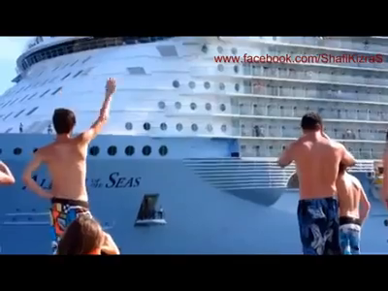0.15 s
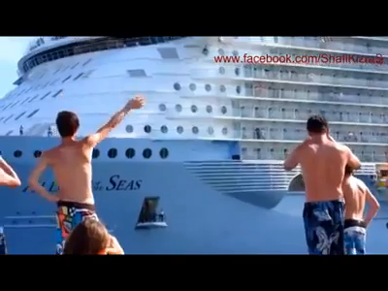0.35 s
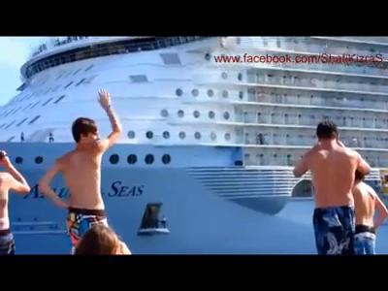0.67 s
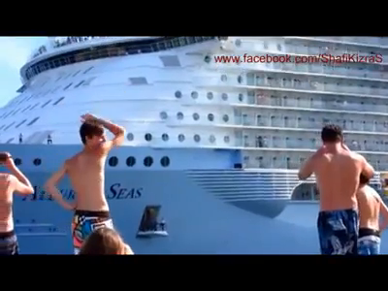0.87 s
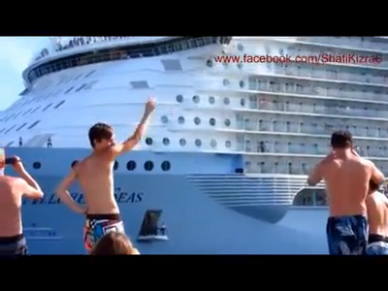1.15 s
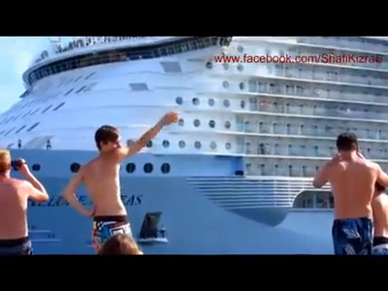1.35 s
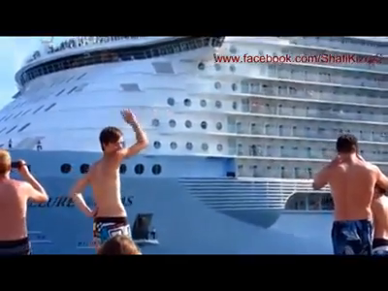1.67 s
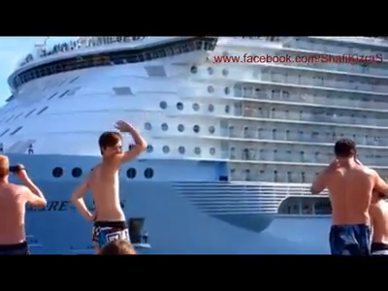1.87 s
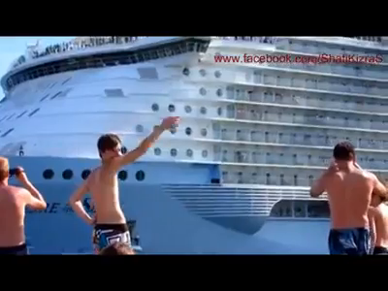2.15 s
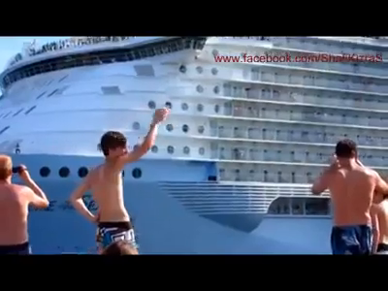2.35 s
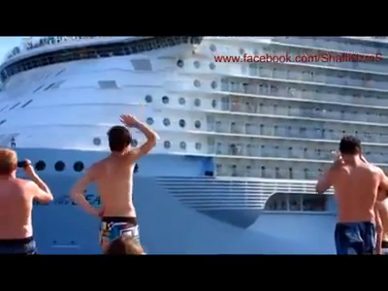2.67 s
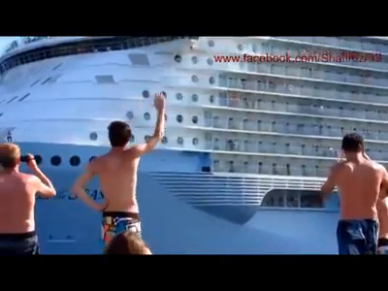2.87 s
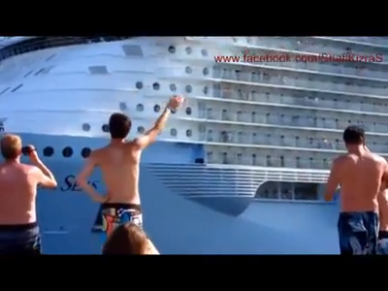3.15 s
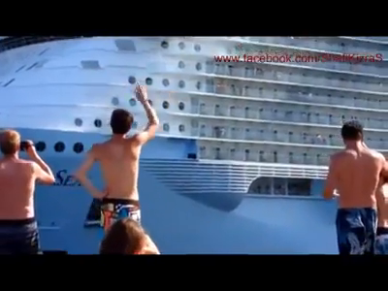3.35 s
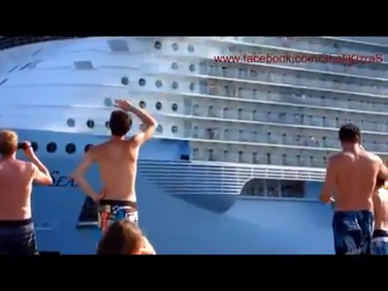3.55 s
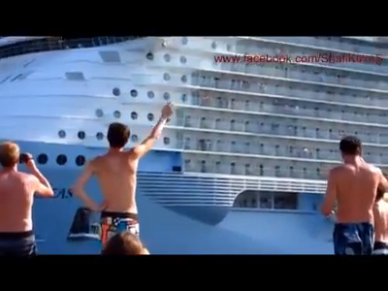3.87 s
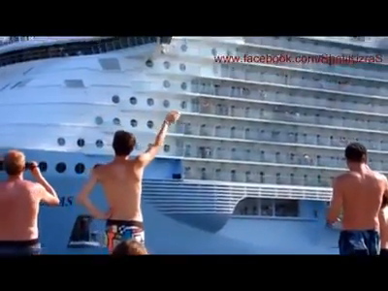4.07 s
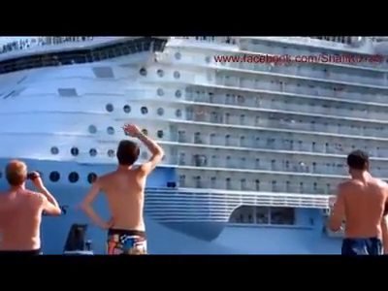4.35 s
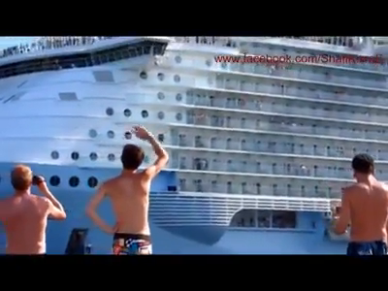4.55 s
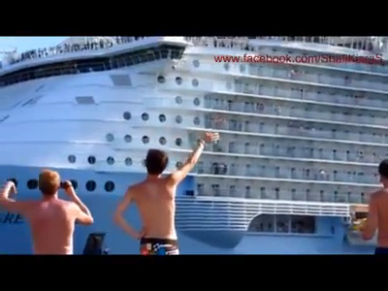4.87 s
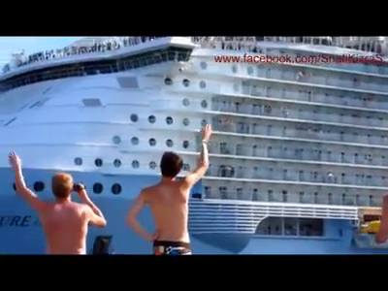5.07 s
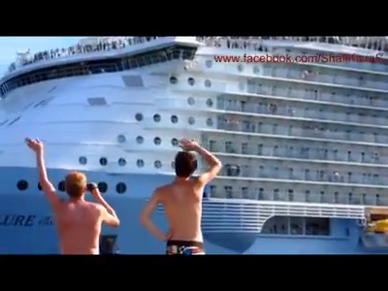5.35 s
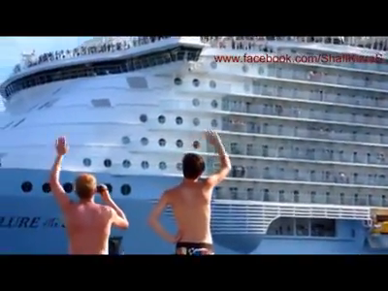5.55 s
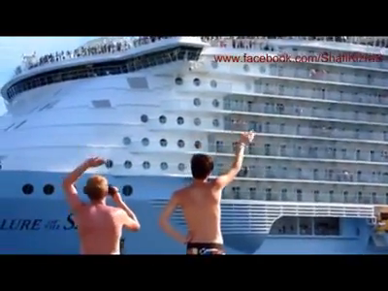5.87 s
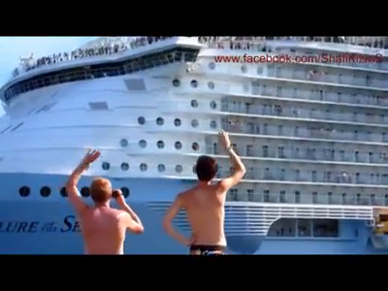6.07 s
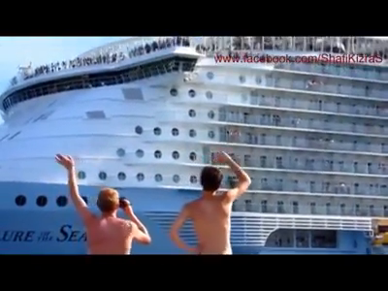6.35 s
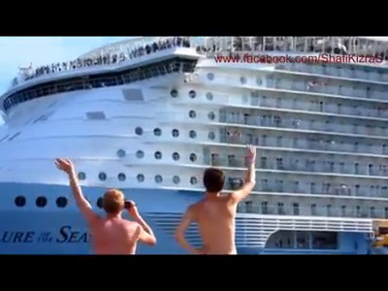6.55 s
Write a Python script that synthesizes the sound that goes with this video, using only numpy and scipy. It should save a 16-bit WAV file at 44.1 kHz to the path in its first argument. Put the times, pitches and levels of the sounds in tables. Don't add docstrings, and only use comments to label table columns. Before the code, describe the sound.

A massive ship's horn, two low rough tones beating together, blares for over six seconds across a beach, almost burying the faint wave hiss.

```python
import sys
import numpy as np
from scipy import signal
from scipy.fft import rfft, irfft
from scipy.io import wavfile
from scipy.ndimage import uniform_filter1d

SR = 44100
rng = np.random.default_rng(int(sys.argv[2]) if len(sys.argv) > 2 else 0)


def materialize(psi):
    bounded = np.clip(np.atleast_2d(psi).T, -1, 1)
    quanta = np.round(bounded * 32767).astype(np.int16)
    wavfile.write(sys.argv[1], SR, quanta)


def voltage_ratio(decibels):
    exponent = np.asarray(decibels, float) / 20
    return 10 ** exponent


N = 296070
SIZE, HOP = 1024, 256
HZ = np.fft.rfftfreq(SIZE, 1 / SR)
TIMES = np.arange(N // HOP + 2) * HOP / SR
BLAST_S, UNMUTE_S, RELEASE_S = .1145, .1218, 6.668


def evened(x):
    return x / np.sqrt(np.mean(abs(x) ** 2) + 1e-20)


def read(points, hz):
    f, value = np.transpose(points)
    return np.interp(np.log(hz + 1), np.log(f + 1), value)


def causal(db):
    log_gain = np.log(voltage_ratio(np.concatenate([db, db[-2:0:-1]])))
    return np.exp(signal.hilbert(log_gain).conj())[:len(db)]


def patches(frames, bins):
    z = rng.standard_normal((len(TIMES), len(HZ)))
    for _ in range(2):
        z = uniform_filter1d(z, max(round(frames), 1), 0)
    z = uniform_filter1d(z, max(round(1.4 * bins), 1), 1)
    return evened(z.T)


def sound(z):
    return signal.istft(z, nperseg=SIZE, noverlap=SIZE - HOP)[1][..., :N]


def passing_db(rows, spread):
    total = 0
    for s, length, hz, db in rows:
        band = np.exp(-(np.log((HZ + 1) / hz) / spread) ** 2)
        total = total + db * np.outer(band, np.exp(-((TIMES - s) / length) ** 2))
    return total


# time_s, level_db
SURF_LEVEL = [
    [(0, -56.5), (.113, -57)],
    [(.125, -69), (.9, -71), (1.4, -73.5), (1.9, -72), (2.15, -68), (2.65, -67.5), (2.8, -72), (4, -73),
     (5.2, -75), (6.71, -74.5)],
]
# pitch_hz, level_db per Hz
SURF_COLOUR = [(20, -12), (100, -3), (300, 0), (900, 0), (1200, -7), (1600, -5), (2300, -8), (2800, -15),
               (4100, -18), (5000, -24), (7000, -25), (8000, -37), (8900, -26), (10400, -24)]
# pitch_hz, likeness (0 to 1)
SURF_LIKENESS = [(30, 0.96), (300, 1), (1500, 0.83), (5000, 0.91), (8000, 0.25), (10000, .05)]


def surf():
    a, b, c, d = rng.standard_normal((len(TIMES), len(HZ), 4)).T
    same = np.clip(read(SURF_LIKENESS, HZ), -1, 1)[:, None]
    left = a + 1j * b
    right = same * left + np.sqrt(1 - same ** 2) * (c + 1j * d)
    colour_db = read(SURF_COLOUR, HZ)[:, None] + 0.95 * patches(6, 10)
    noise = evened(sound(np.array([left, right]) * voltage_ratio(colour_db)))
    level = np.transpose(SURF_LEVEL[0] + SURF_LEVEL[1])
    return noise * voltage_ratio(28.5 + np.interp(np.arange(N) / SR, *level))


# start_s (centre), pitch_hz, width_hz, length_s, level_db
PUFFS = [
    (0.901, 5960, 694, 0.015, -48.5),
    (5.462, 2850, 201, 0.04, -45.5),
]


def puffs():
    shape = 0
    for s, hz, width, length, db in PUFFS:
        puff = np.exp(-((HZ[:, None] - hz) / width) ** 2 - ((TIMES - s) / length) ** 2)
        shape = shape + voltage_ratio(db) * puff / np.sqrt(width / 43)
    field = (2, len(HZ), len(TIMES))
    z = rng.standard_normal(field) + 1j * rng.standard_normal(field)
    return sound((z[0] + .4 * z) * shape)


# time_s, half_length_s, centre_hz, level_db
EDDIES = [(0.275, 0.1, 1920, 1.5), (0.475, 0.16, 2670, -1), (0.625, 0.31, 586, 3.5), (0.8, 0.1, 4920, 5),
          (1.05, 0.098, 3840, -4.5), (1.2, 0.22, 900.0, 2), (1.3, 0.08, 3830, 11),
          (1.575, 0.13, 2700.0, -2), (1.7, 0.16, 900.0, 1.5), (1.825, 0.12, 3850, 9), (2.0, 0.1, 1310, 3),
          (2.625, 0.12, 5030, 8.5), (2.675, 0.26, 900.0, 4), (3.075, 0.11, 1280, 3),
          (3.1, 0.14, 2670, -12.5), (3.375, 0.16, 2730, 7), (3.65, 0.1, 900.0, 2.5),
          (3.825, 0.045, 2700.0, 8), (4.35, 0.084, 2640, -5.5), (4.6, 0.08, 5080, 7),
          (4.95, 0.045, 3800.0, 3.5), (5.375, 0.12, 1930, -6), (5.475, 0.1, 900.0, 1.5),
          (5.475, 0.15, 5000.0, -6), (5.675, 0.11, 3900, 13), (6.025, 0.05, 3900, 10.5),
          (6.25, 0.31, 900.0, -1), (6.4, 0.35, 3900, -2.5)]


def eddies_db():
    return passing_db(EDDIES, spread=0.78)


# pitch_hz, level_db per bin
HISS_COLOUR = [(20, -57.5), (60, -55.5), (200, -53), (700, -53.5), (1200, -58), (2000, -66), (2550, -72),
               (3100, -70), (4500, -76.5), (6000, -81.5), (7500, -92.5), (10000, -110)]


def hiss():
    a, b, c, d, e, f = rng.standard_normal((len(TIMES), len(HZ), 6)).T
    apart = 0.35 + HZ[:, None] / 4000
    left = a + 1j * b + apart * (c + 1j * d)
    right = a + 1j * b + apart * (e + 1j * f)
    z = np.array([left, right]) / np.hypot(1, apart)
    level_db = read(HISS_COLOUR, HZ)[:, None] + 8.5 + 1.5 * patches(8, 8)
    level_db = level_db + 0.43 * eddies_db()
    level_db = level_db - 249.5 * np.maximum(TIMES - RELEASE_S, 0)
    return sound(z * voltage_ratio(level_db))


# time_s, level_db
BODY = [(0.15, -2.6), (0.5, -1), (0.95, -1.9), (1.3, -1.9), (1.6, -1.7), (2.1, -3.5), (2.45, -0.9),
        (2.9, -3.5), (3.2, -1.2), (3.5, -1.5), (4.1, 0.4), (4.7, 0.8), (5.1, 1), (5.55, 3.5), (5.75, 0),
        (6.1, -0.8), (6.5, 3.5), (6.71, 2.5)]


def body_db():
    return np.interp(TIMES, *np.transpose(BODY))


def release_db():
    bass_db_per_s, twice_as_fast_hz = 110, 130
    return -bass_db_per_s * np.outer(1 + HZ / twice_as_fast_hz, np.maximum(TIMES - RELEASE_S, 0))


def pulses(pitch, uneven_db, jitter_ms):
    hz, drift, anchor = pitch
    t = np.arange(N) / SR - anchor
    turns = hz * t + drift * t ** 2 / 2
    strength, shift = rng.standard_normal((1400, 2))[np.round(turns).astype(int)].T
    turns = turns - np.round(turns) + shift * jitter_ms * hz / 1000
    spikes = np.sin(np.pi * 181 * turns) / (np.sin(np.pi * turns) + 1e-12)
    return -spikes * voltage_ratio(uneven_db * strength) / np.sqrt(2)


def horn(pitch, flare, level_db, echo, echo_ms, uneven_db, jitter_ms, slow, fast, apart):
    z = signal.stft(pulses(pitch, uneven_db, jitter_ms), nperseg=SIZE, noverlap=SIZE - HOP)[2]
    z = np.pad(z, ((0, 0), (0, len(TIMES))))[:, :len(TIMES)]
    hz = HZ[:, None]
    treble = np.tanh(hz / 1800)
    wander = 1 + 0.036 * patches(60, 500)[0] + 0.0013 * (TIMES - 3)
    bounce = echo * np.exp(-hz / 6000 - 2j * np.pi * hz * echo_ms / 1000 * wander)
    gusts = slow * (patches(25, 6.2) + 1j * patches(25, 14))
    gusts = gusts + fast * (patches(1.6, 60) + 1j * patches(1.3, 30))
    flicker = voltage_ratio(3.6 * np.tanh((hz / 3500) ** 1.5) * patches(2, 300))
    per_port = [apart * treble * (patches(14, 6) + 1j * patches(14, 6)) for _ in range(2)]
    path = np.array([(1 + treble * gusts + port) * flicker for port in per_port])
    path /= np.sqrt(np.mean(abs(path) ** 2, 2, keepdims=True))
    voiced = z * causal(read(flare, HZ))[:, None] * np.exp(.9j)
    return sound(voiced * (1 - bounce) * path * voltage_ratio(level_db))


# pitch_hz, level_db
DEEP_FLARE = [(30, -66.5), (71, -51.5), (142, -30), (213, -25.5), (285, -39), (356, -36.5), (450, -54),
              (700, -44.5), (1000, -59), (2000, -61), (4000, -74), (8000, -100)]


def deep_horn():
    above = np.clip(HZ / 60 - 2.5, 0, 1)
    tilt_db_per_s = np.where(HZ < 260, -1.5, 0.32 * np.exp(-HZ / 1500))
    turn_db = np.outer(tilt_db_per_s, TIMES - 3.4)
    level_db = above[:, None] * (turn_db + 0.54 * body_db())
    level_db = level_db + .5 * release_db()
    pitch = (71.163, .012, 4.50925)  # Hz, drift Hz a second, time s of one pulse
    return horn(pitch, DEEP_FLARE, level_db, echo=0.014, echo_ms=11.0, uneven_db=-0.8, jitter_ms=0.09,
                slow=0.36, fast=0.8, apart=0.17)


# pitch_hz, level_db
LOUD_FLARE = [(40, -65), (92, -26.5), (185, -22.5), (280, -23.5), (550, -34), (800, -32), (1100, -40.5),
              (1500, -37.5), (1700, -49.5), (2200, -50), (2600, -60.5), (4300, -64), (6000, -79.5),
              (7300, -84.5), (8000, -102)]
# time_s, half_length_s, centre_hz, level_db
MEETINGS = [(0.33, 0.073, 1120, 4.5), (1.24, 0.054, 3000, 8), (1.27, .08, 950, 5.5), (2.58, .03, 5000, -4),
            (2.65, .05, 3900, 4), (2.73, 0.062, 1150, -1), (3.44, 0.066, 1450, 3.5), (3.65, 0.061, 776, 0),
            (4.62, .1, 2000, 5.5), (5.12, 0.15, 744, 1), (5.47, 0.085, 1150, -13), (5.85, 0.12, 740, -0.5),
            (1.0, .1, 318, 2.5), (5.65, .08, 370, 2), (6.62, .06, 2000, 4.5), (6.6, .08, 740, -2)]


def loud_horn():
    swell_share = np.where(HZ < 120, 0.27, 1 / (1 + (HZ / 900) ** 2))
    level_db = np.outer(swell_share, body_db()) + release_db()
    level_db += eddies_db() + passing_db(MEETINGS, spread=0.24)
    bell_hz, width_hz, bell_db, growth_db_per_s = 740, 36, 3.3, 0.9
    bell = np.exp(-((HZ - bell_hz) / width_hz) ** 2)
    level_db += np.outer(bell, bell_db + growth_db_per_s * (TIMES - 3))
    fade_s, fade_db_per_s, below_hz = 2.65, -2.56, 272
    second = (HZ > 120) / (1 + (HZ / below_hz) ** 8)
    level_db += np.outer(second, fade_db_per_s * np.maximum(TIMES - fade_s, 0))
    pitch = (92.269, .028, 3.5129)  # Hz, drift Hz a second, time s of one pulse
    return horn(pitch, LOUD_FLARE, level_db, echo=0.55, echo_ms=1.922, uneven_db=-0.64, jitter_ms=0.019,
                slow=0.21, fast=0.035, apart=0.32)


def scene():
    arrived = np.clip((np.arange(N) / SR - BLAST_S) / .004, 0, 1)
    return surf() + puffs() + (hiss() + deep_horn() + loud_horn()) * arrived


def thinned(x, from_hz, keep):
    hz, t, z = signal.stft(x, SR, nperseg=2048)
    usual = np.sqrt(uniform_filter1d(np.median(abs(z) ** 2, (0, 2)), 20))
    mood = uniform_filter1d(rng.standard_normal((len(hz), len(t))), 5, 1)
    moment = voltage_ratio(3.5 * evened(uniform_filter1d(mood, 40, 0)))
    bar = keep * (usual * np.clip(hz / from_hz - 1, 0, 1))[:, None] * moment
    return signal.istft(z * (abs(z) > bar), SR, nperseg=2048)[1][:, :N]


# start_s, end_s, late_ms, blend_in_ms, blend_out_ms
SLIPS = [
    (-1, .3082, 1.45, 1, .1),
    (.8290, .8420, 1.85, 1.5, 1.5),
    (1.1312, 1.1455, 1.45, .1, 1.5),
]


def slipped(x):
    t, snap = np.arange(N) / SR, .27
    for start, end, late_ms, in_ms, out_ms in SLIPS:
        inside = np.minimum((t - start) / in_ms, (end - t) / out_ms) * 1000
        share = snap * np.clip(3 * inside, 0, 1) + (1 - snap) * np.clip(inside / 3, 0, 1)
        x = (1 - share) * x + share * np.roll(x, round(late_ms * SR / 1000), 1)
    return x


def roll_off(x):
    return signal.sosfilt(signal.butter(12, 11260, fs=SR, output="sos"), x)


# pitch_hz, left_minus_right_db
PORT_BALANCE = [(60, 1.5), (250, .3), (1000, 1.1), (4000, -1.)]
# pitch_hz, left_lead_radians
PORT_LEAD = [(30, -.5), (92, -.4), (185, -.2), (370, -.05), (800, -.1), (1400, -.2), (2500, -.4),
             (6000, -.5)]


def record(dry):
    hz, t = np.fft.rfftfreq(N, 1 / SR), np.arange(N) / SR
    edge_hz = 10340
    halves = [.5, -.5]
    ports = voltage_ratio(np.outer(halves, read(PORT_BALANCE, hz))) * np.exp(1j * np.outer(halves, read(PORT_LEAD, hz)))
    dead_band = np.where((hz > 8000) & (hz < 8600), .1, 1)
    x = irfft(rfft(dry) * ports * dead_band, N)
    x = thinned(x, from_hz=3300, keep=1.0)
    x = signal.oaconvolve(x, signal.firwin(511, edge_hz, window=("kaiser", 9), fs=SR)[None], "same")
    x = slipped(x)
    mute = np.where((t > BLAST_S) & (t < UNMUTE_S), .06, 1.)
    x = x * uniform_filter1d(mute, 70)
    x = signal.oaconvolve(x, signal.firwin(41, edge_hz + 300, fs=SR)[None], "same")
    return roll_off(x)


dry = scene()
out = record(dry)
materialize(out)
```